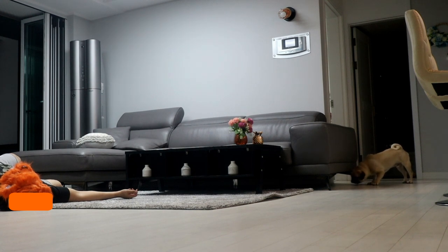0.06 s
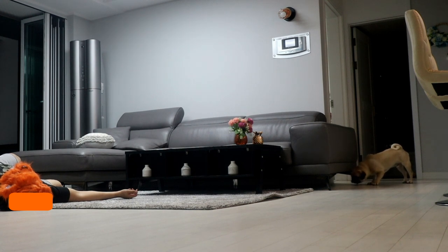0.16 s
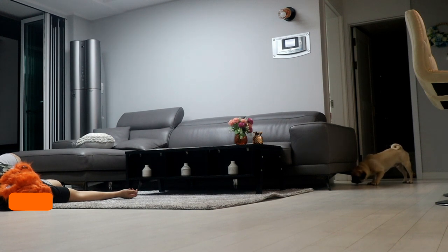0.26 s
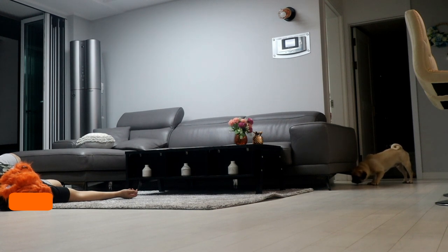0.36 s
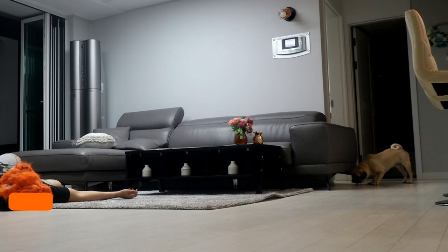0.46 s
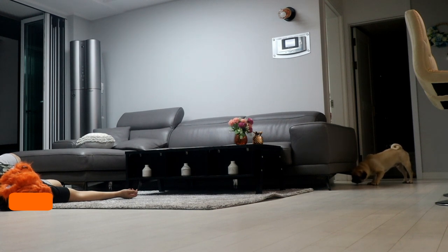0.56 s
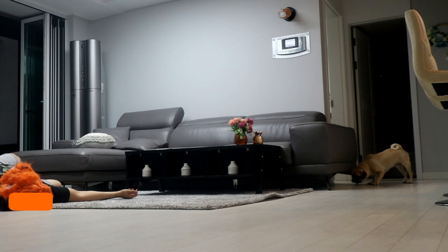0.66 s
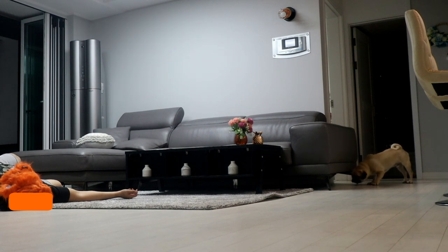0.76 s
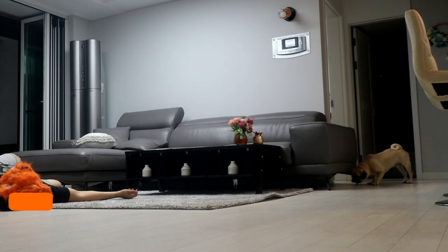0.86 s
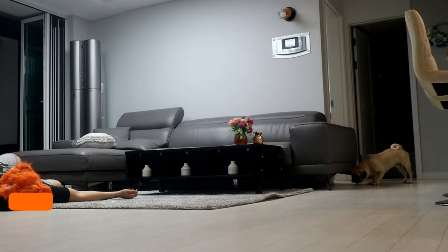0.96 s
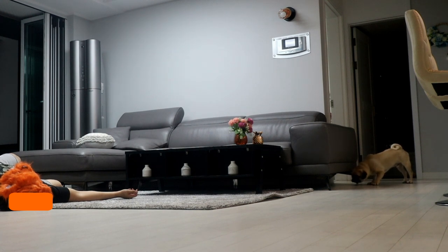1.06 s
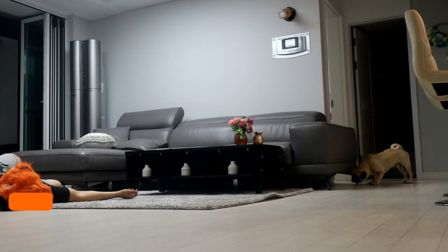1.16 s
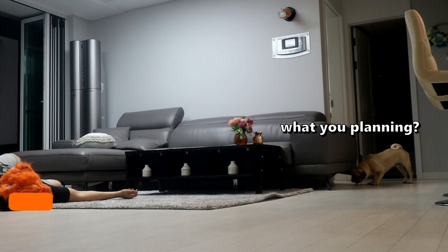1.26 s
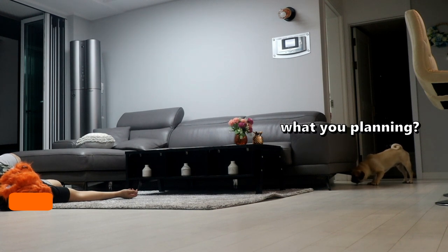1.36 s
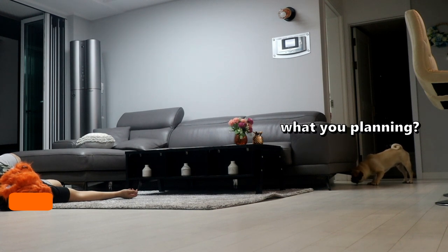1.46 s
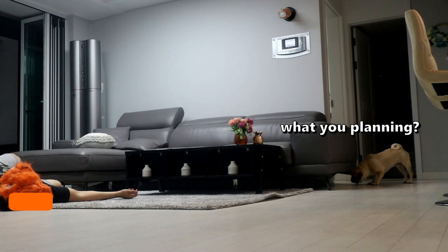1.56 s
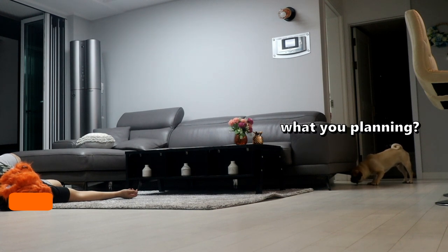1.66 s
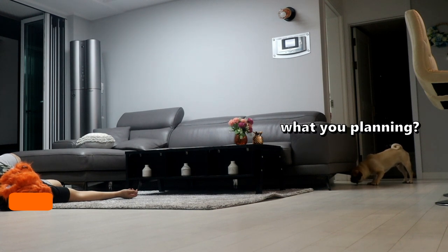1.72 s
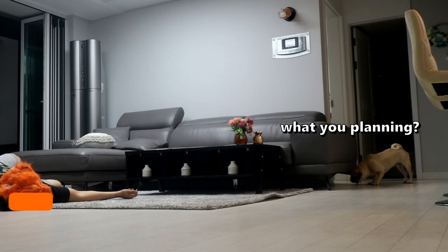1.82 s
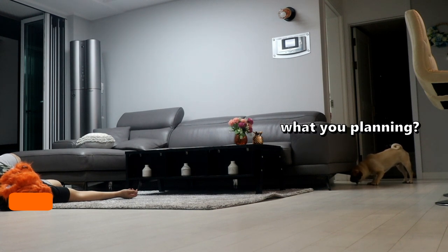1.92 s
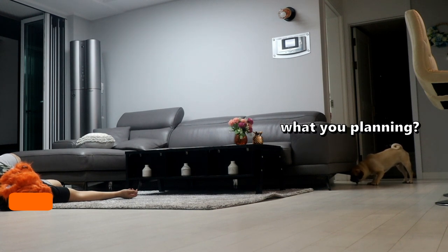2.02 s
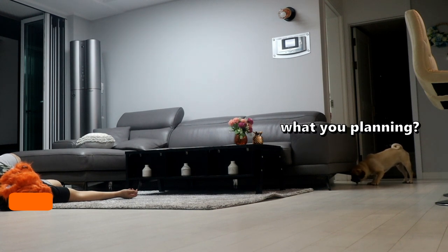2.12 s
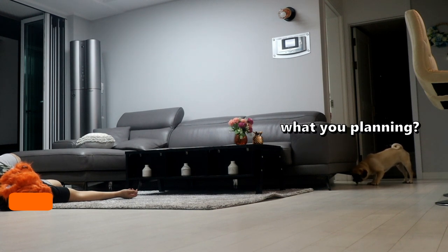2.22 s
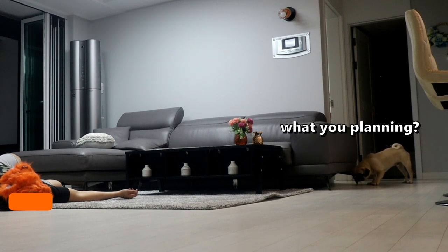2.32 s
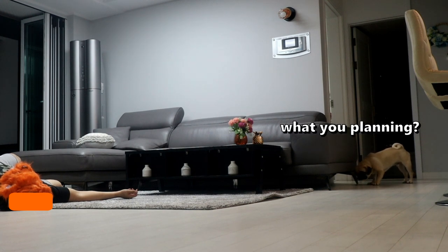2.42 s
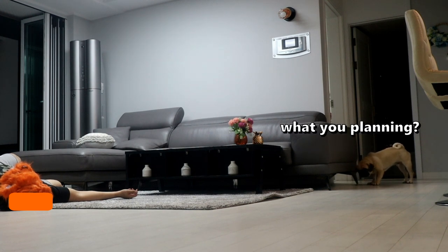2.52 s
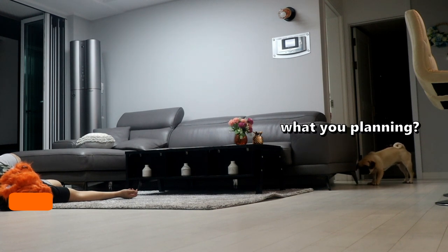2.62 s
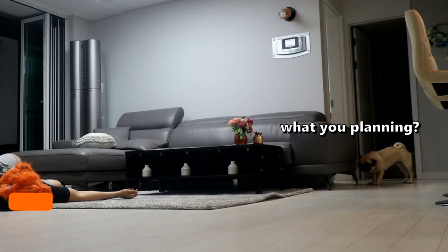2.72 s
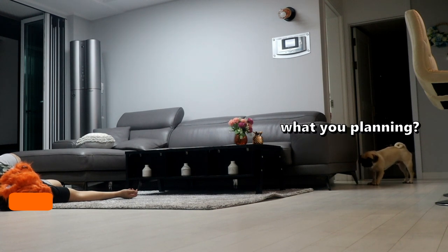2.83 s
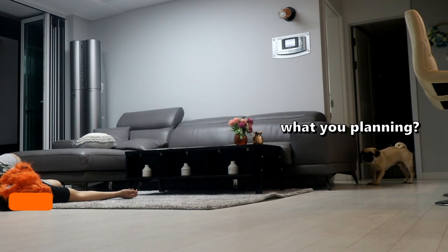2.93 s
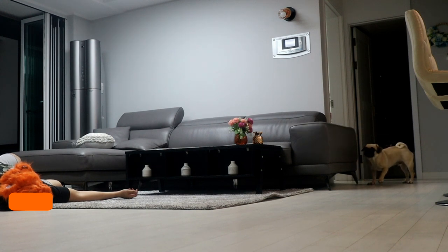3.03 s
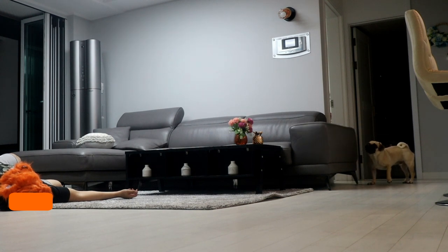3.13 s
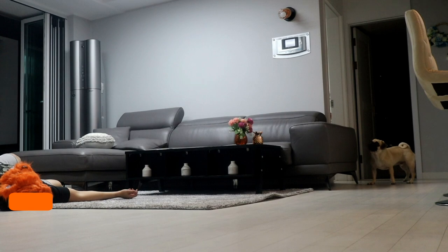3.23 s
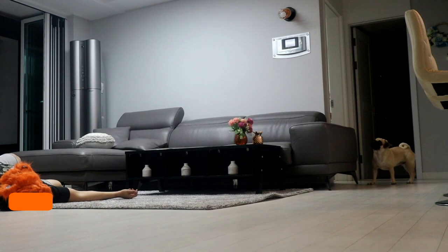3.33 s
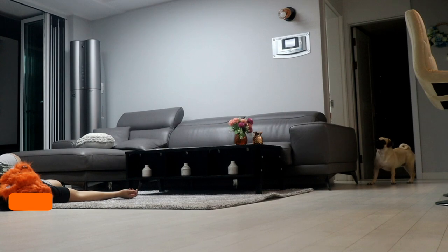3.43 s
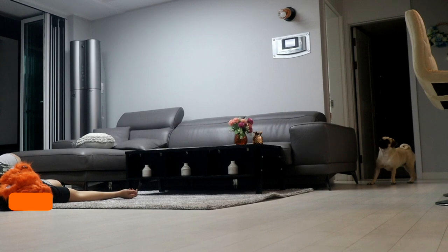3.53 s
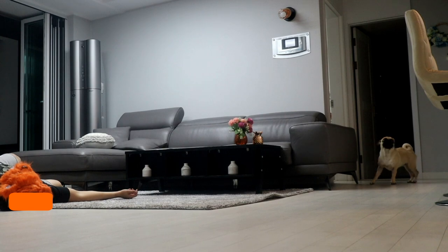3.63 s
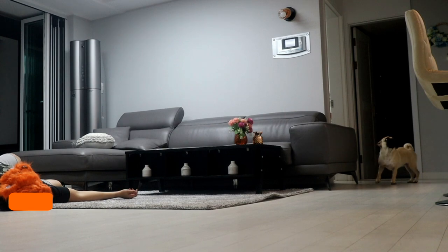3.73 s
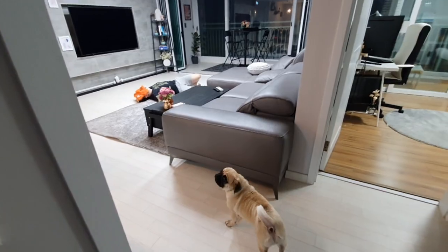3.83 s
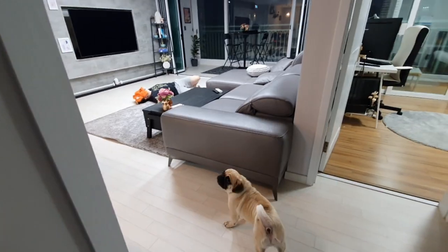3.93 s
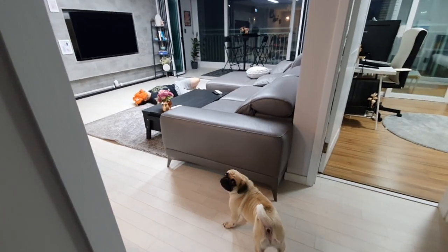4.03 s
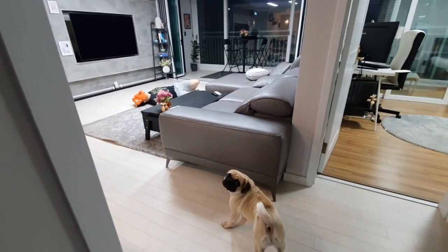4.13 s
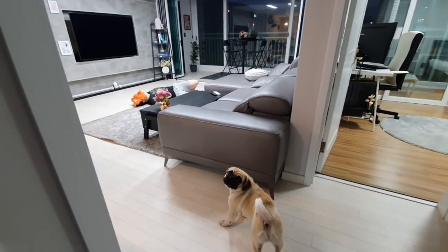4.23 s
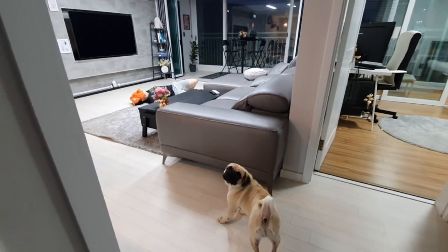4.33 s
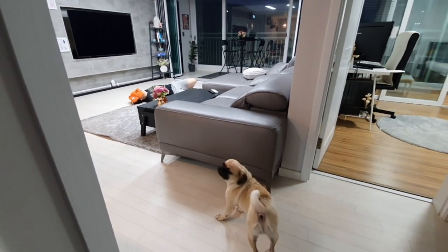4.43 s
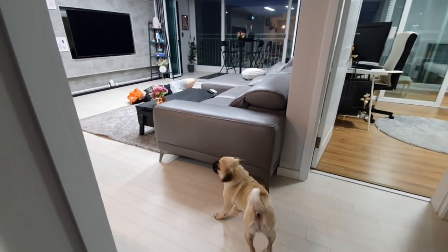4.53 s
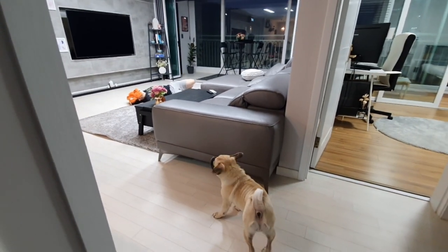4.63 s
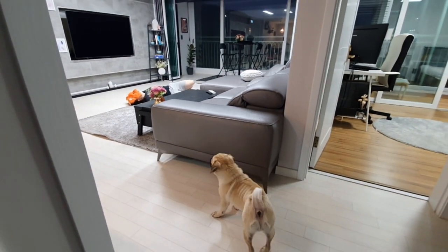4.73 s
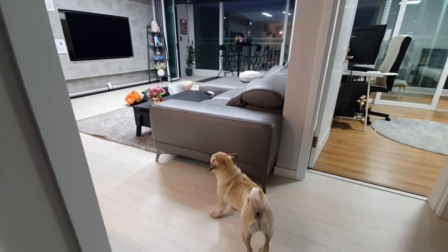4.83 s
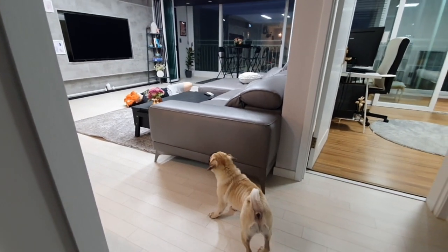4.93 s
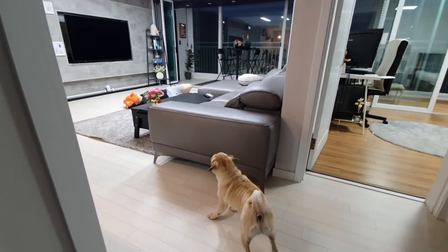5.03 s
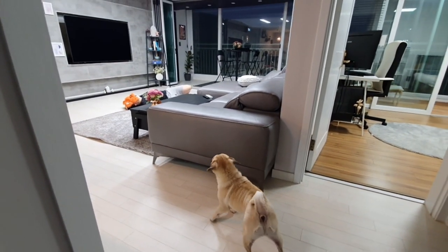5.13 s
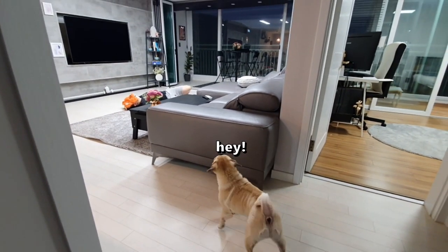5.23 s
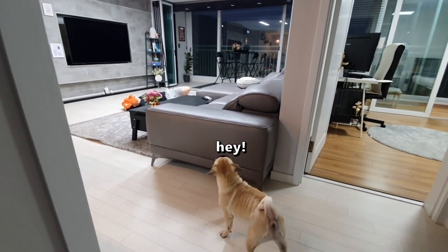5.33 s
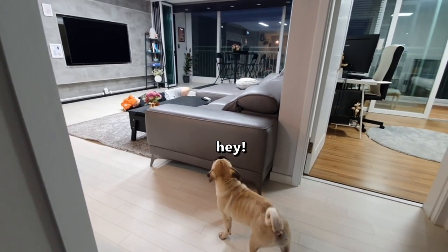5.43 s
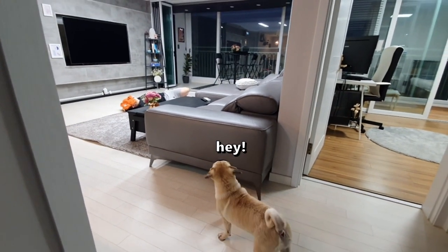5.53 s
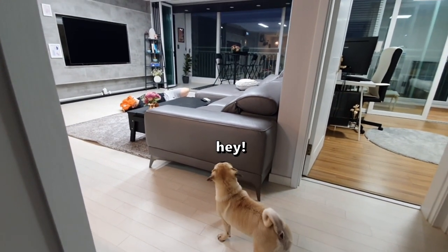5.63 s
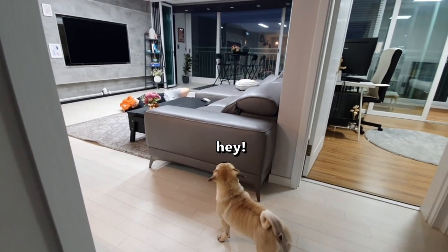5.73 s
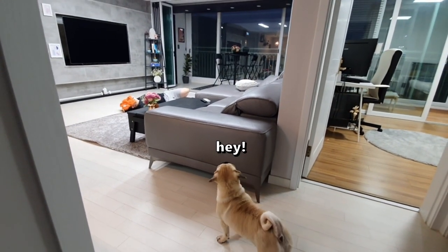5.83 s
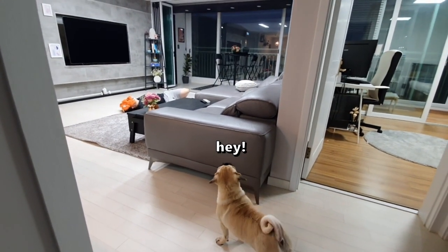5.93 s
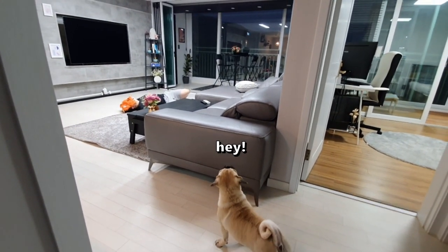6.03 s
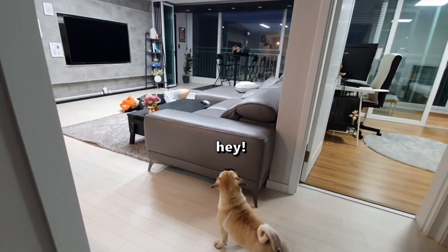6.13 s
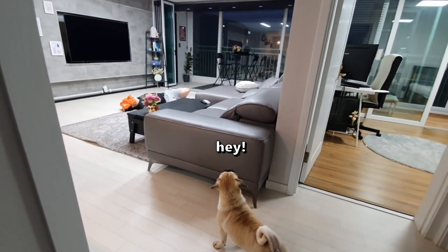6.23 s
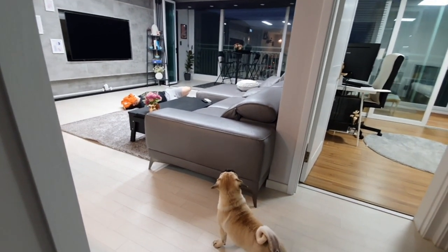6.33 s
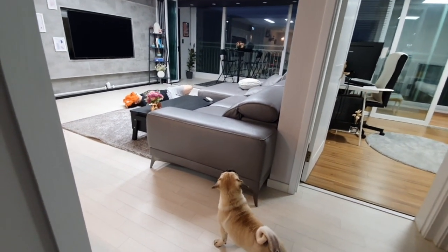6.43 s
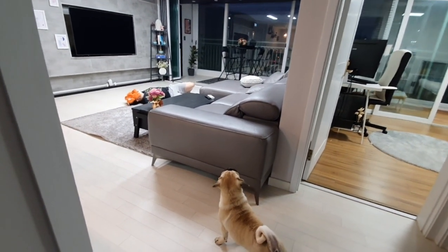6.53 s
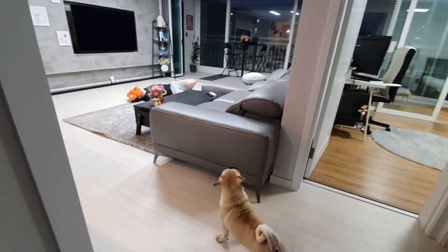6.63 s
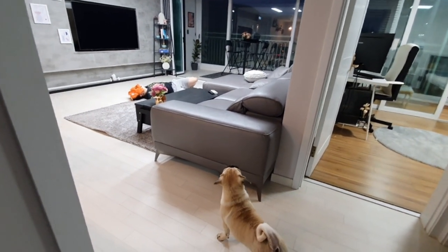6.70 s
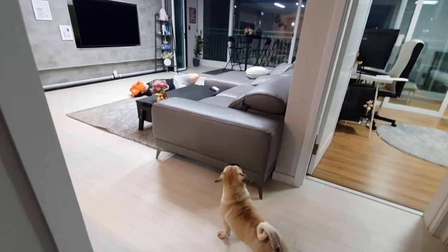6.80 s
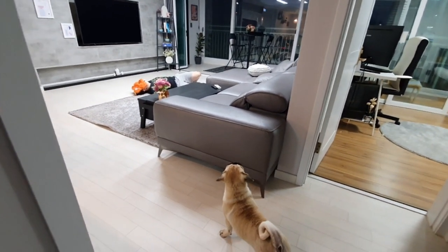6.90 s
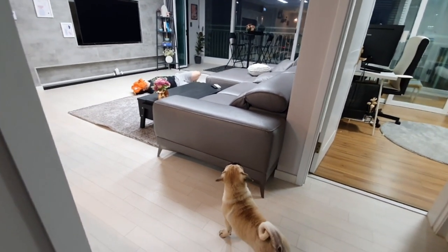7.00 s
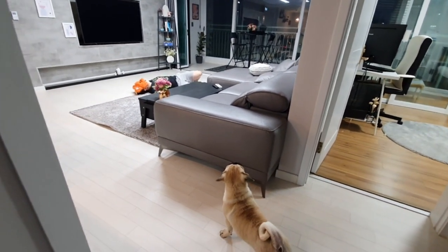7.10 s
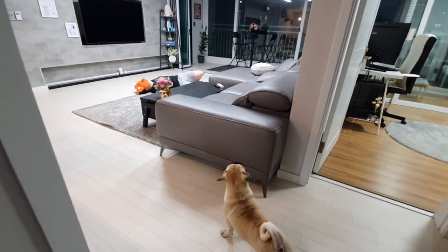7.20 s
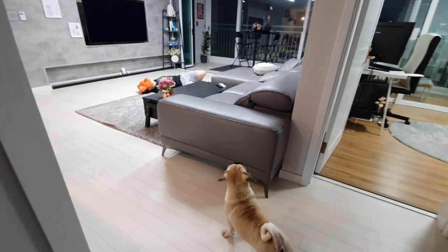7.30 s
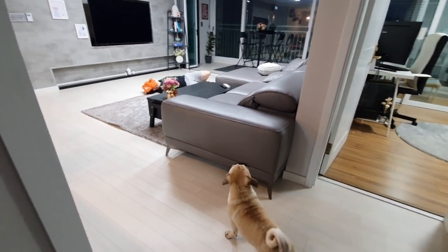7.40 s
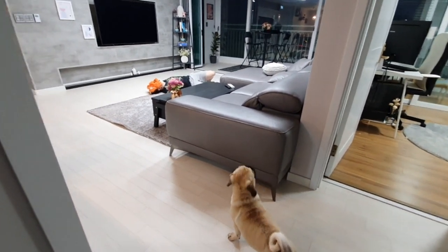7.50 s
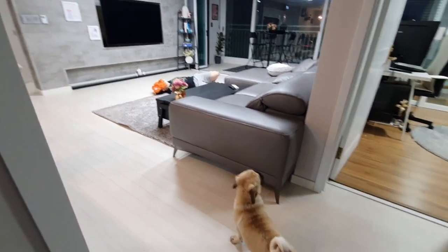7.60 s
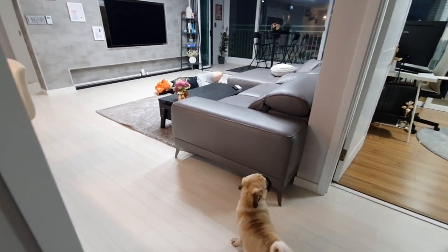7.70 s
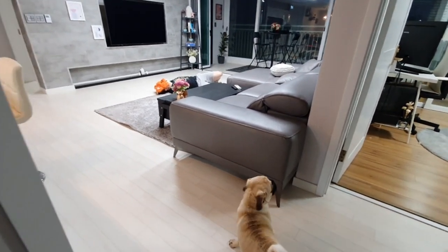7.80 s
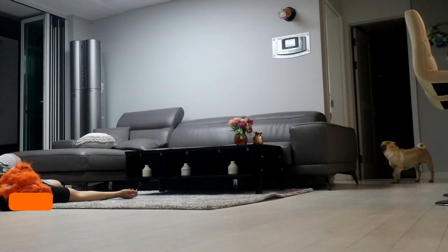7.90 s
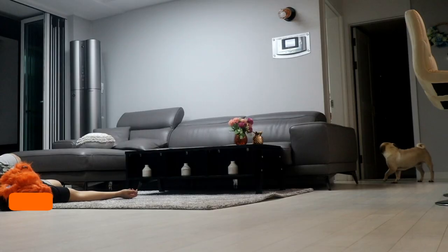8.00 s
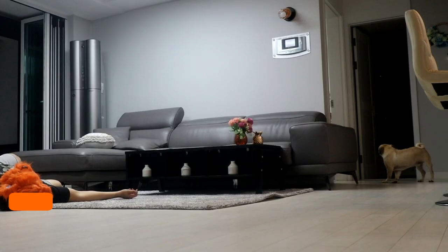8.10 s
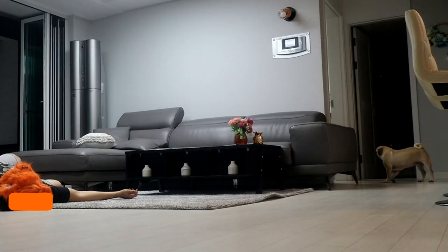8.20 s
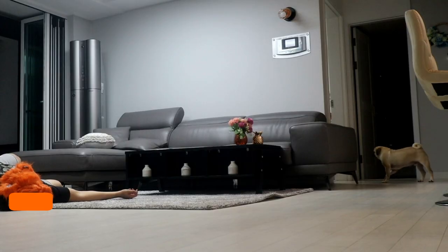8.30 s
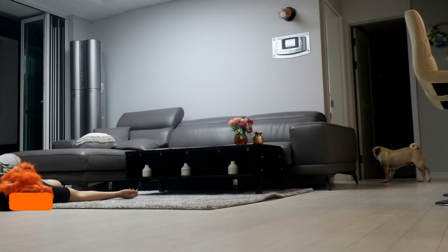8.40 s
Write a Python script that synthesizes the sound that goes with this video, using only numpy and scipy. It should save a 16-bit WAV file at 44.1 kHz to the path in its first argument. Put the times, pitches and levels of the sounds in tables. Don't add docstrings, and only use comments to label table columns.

```python
import sys
import numpy as np
from scipy import signal
from scipy.fft import rfft, irfft, next_fast_len
from scipy.io import wavfile
from scipy.ndimage import uniform_filter1d, minimum_filter1d, map_coordinates

SR = 44100
rng = np.random.default_rng(int(sys.argv[2]) if len(sys.argv) > 2 else 0)


def persist_wave(psi):
    counts = np.round(np.clip(psi, -1, 1) * 32767).astype(np.int16)
    wavfile.write(sys.argv[1], SR, np.atleast_2d(counts).T)


def invert_db(x):
    u = np.asarray(x, float) / 20
    return 10 ** u


N = 372729
T = np.arange(N) / SR

# freq_hz, side_minus_mid_db
FAR_SIDE = [(60, -12.5), (180, -10), (550, -0.5), (1650, 4), (4970, 5), (15000, 7.5)]
# freq_hz, side_minus_mid_db
NEAR_SIDE = [(60, -2), (180, -13.5), (550, -2.5), (1650, 3.5), (4970, -2), (15000, 5)]


def unit(x):
    return x / np.sqrt(np.mean(x ** 2) + 1e-20)


def along(points, hz):
    f, v = np.transpose(points)
    return np.interp(np.log(hz + 1), np.log(f + 1), v)


def curves(rows):
    s, *cols = np.transpose(rows)
    return [np.interp(T, s, c) for c in cols]


def held(rows):
    s, *cols = np.transpose(rows)
    return np.array(cols)[:, np.searchsorted(s, T, side="right") - 1]


def swells(rows):
    return sum(db * np.exp(-((T - s) / half) ** 2) for s, half, db in rows)


def wobble(rate):
    knots = rng.standard_normal(int(N * rate / SR) + 4)
    return map_coordinates(knots, [T * rate])


def filtered(x, response):
    m = next_fast_len(N + SR // 2)
    return irfft(rfft(x, m) * response(np.fft.rfftfreq(m, 1 / SR)), m)[..., :N]


def coloured(x, spectrum):
    gain = invert_db(along(spectrum, np.fft.rfftfreq(8192, 1 / SR)))
    cep = irfft(np.log(gain + 1e-6))
    cep[1:4096] *= 2
    cep[4097:] = 0
    return signal.fftconvolve(x, irfft(np.exp(rfft(cep)))[:4096])[:N]


def resonances(modes):
    def response(f):
        total = 0
        for k, (centre, width, db) in enumerate(modes):
            peak = 1j * f * width / (centre * centre - f * f + 1j * f * width)
            total = total + (-1) ** k * invert_db(db) * peak
        return total
    return response


def pulses(cycles, scatter_db):
    clicks = np.diff(np.floor(cycles), prepend=0) > 0
    return unit(clicks * invert_db(scatter_db * rng.standard_normal(N)))


def muffled(voice, opening, hz, muffle_db):
    low = filtered(voice, lambda f: 1 / (1 + (f / hz) ** 6))
    return low + (voice - low) * invert_db(muffle_db * (np.clip(opening, 0, 1) - 1))


def spread(pair, side):
    mid, wide = filtered(pair, lambda hz: np.array([np.ones_like(hz), invert_db(along(side, hz))]))
    return np.array([mid + wide, mid - wide])


def room(x, side, gap, wet_db):
    # freq_hz, t60_s
    t60_points = [(150, 0.6551), (600, 0.64587), (3000, 0.54856), (8000, .7), (15000, 0.34)]
    hz, t, z = signal.stft(rng.standard_normal((2, SR * 3 // 4)), SR, nperseg=256)
    decay = invert_db(-60 * t / along(t60_points, hz)[:, None])
    width = [np.ones((len(hz), 1)), invert_db(along(side, hz))[:, None]]
    mid, wide = signal.istft(z * decay * width, SR, nperseg=256)[1]
    tail = np.pad([mid + wide, mid - wide], ((0, 0), (int(gap * SR), 0)))
    tail = tail / np.linalg.norm(mid)
    return invert_db(wet_db) * signal.fftconvolve(x[None], tail, axes=1)[:, :N]


def house(far):
    # start_s, rumble_db, air_db, scuff_db
    calm = [
        (0, -51.5, -46, -59.5),
        (3.1, -53.5, -49, -60.5),
        (3.78, -62, -64, -82.5),
        (7.92, -53, -50.5, -61.5),
    ]
    # middle_s, half_width_s, lift_db
    shuffles = [
        (2.69, 0.07697, 5),
        (3.52, 0.083, 8.5),
        (3.93, 0.14606, 13),
        (4.87, 0.12, 9.5),
        (5.27, 0.082, 9.5),
        (6.3, .08, 2.5),
        (6.77, .05, 9),
        (7.02, .12, 9),
        (7.27, .12, 5.5),
        (8.45, 0.29, 6.5),
    ]
    # middle_s, half_width_s, lift_db
    thuds = [
        (2.84, 0.1038, 0),
        (4.03, 0.1676, 10.5),
        (4.5, 0.081, 0.5),
        (4.83, 0.2063, 7.5),
        (5.32, 0.06687, 15),
        (6.07, 0.1117, 9.5),
        (7.34, .05, 3.5),
        (8.16, 0.1859, 4.5),
    ]
    # freq_hz, density_db
    rumble = [(12, -59), (20, -23.5), (59, 4.5), (135, -16.5), (162, -15), (200, -11.5), (260, -52.5),
              (440, -120)]
    # freq_hz, density_db
    air = [(59, -28.5), (100, 3), (222, -1), (295, -2), (636, -9.5), (776, -7), (3000, -34.5),
           (3900, -40.5), (6600, -120)]
    # freq_hz, density_db
    far_hiss = [(710, -25.5), (1200, 1), (2260, 1.5), (2520, 0), (3220, -0.5), (3700, -1.5), (6540, -9),
                (10200, -10), (15600, -29.5)]
    # freq_hz, density_db
    near_hiss = [(710, -42.5), (1200, -18), (1750, -5.5), (2600, -9), (3660, -13), (6830, -20), (9730, -37),
                 (12500, -27), (15600, -28.5)]
    # freq_hz, density_db
    preamp = [(3000, -20), (9500, -12), (11500, 0.5), (15000, -2)]

    def layer(spectrum):
        return unit(filtered(rng.standard_normal((2, N)), lambda hz: invert_db(along(spectrum, hz))))

    shuffle_db, thud_db = swells(shuffles), swells(thuds)
    air_lift_db = 0.18 * shuffle_db + 0.34 * thud_db
    rumble_db, air_db, scuff_db = held(calm) + [thud_db, air_lift_db, shuffle_db]
    low = invert_db(rumble_db + 0.7 * wobble(5.8)) * layer(rumble)
    low = low + invert_db(air_db + 0.4 * wobble(24)) * layer(air)
    grain = invert_db(scuff_db + 1.5 * wobble(44))
    distant = spread(low + grain * layer(far_hiss), FAR_SIDE)
    near = low + grain * layer(near_hiss) + invert_db(-90.5) * layer(preamp)
    close = spread(near, [(100, .5), (2000, 1.5)])
    return far * distant + (1 - far) * close * invert_db([[3], [-3]])


def growl():
    # time_s, effort_db, mouth_open_0_1
    effort = [
        (0.0, -38.5, 0.23),
        (0.44, -42.5, 0.94),
        (0.62, -38.5, 0.69),
        (0.78, -47, 0.52),
        (0.97, -42.5, 0.97),
        (1.85, -40, .1),
        (2.32, -38, 0.61),
        (2.6, -42, 0.51),
        (2.86, -52.5, 0.49),
    ]
    # start_s, rate_hz
    flaps = [
        (0, 24.5),
        (.2, 23.55),
        (1.45, 24.65),
        (1.85, 22.4),
        (2.1, 18.55),
        (2.45, 20.5),
    ]
    # centre_hz, width_hz, level_db
    throat_modes = [(96.146, 28.41, 0.5), (197.29, 66.27, -2.5), (330.32, 53.22, -1.5), (495.55, 78.22, 2),
                    (620, 93.18, -1), (800.5, 77.84, -4), (1016, 38.43, -3)]
    # centre_hz, width_hz, level_db
    nose_modes = [(1775.1, 276.6, 9), (3439.8, 320.3, 9.5), (6994.6, 510, 4.5), (9138.2, 828, 9),
                  (10400, 1086.5, 7)]
    nose_shuts_s, nose_fade_db_per_s = 2.6948, 120

    throat_db, opening = curves(effort)
    hiss_db = -66 + 0.2772 * (throat_db + 46.5) + 4 * opening
    hiss_db = hiss_db - nose_fade_db_per_s * np.maximum(T - nose_shuts_s, 0)
    flap_cycles = .06 + np.cumsum(held(flaps)[0]) / SR
    flap = .5 + .5 * np.cos(2 * np.pi * flap_cycles)
    pitch_hz = 105 * np.exp(.2 * wobble(60))
    cords = pulses(np.cumsum(pitch_hz) / SR, scatter_db=2.5)
    source = (cords + .4 * rng.standard_normal(N)) * (.2 + flap ** 2)

    def lips(hz):
        return resonances(throat_modes)(hz) * hz / (hz - 60j) / (1 + (hz / 1120) ** 10)

    throat = unit(filtered(source, lips))
    throat = invert_db(throat_db + 2.6196) * muffled(throat, opening, hz=570.53, muffle_db=11.0)
    puffs = rng.standard_normal(N) * (.04 + flap ** 6) * invert_db(2.5 * wobble(24))
    hiss = unit(filtered(puffs, lambda hz: resonances(nose_modes)(hz) ** 2))
    hiss = invert_db(hiss_db + 9.5) * hiss
    on = T < effort[-1][0]
    wet = 0
    for k in range(2):
        turn = np.floor(T / .3) % 2 == k
        wet = wet + room((throat + .4 * hiss) * on * turn, FAR_SIDE, gap=.006, wet_db=-5)
    direct = .8 * throat * on + hiss * on * [[1], [-.3]]
    return (direct + wet) * invert_db([[.5], [-.5]])


def claws():
    # time_s, peak_db, crack_db
    ticks = [(2.626, -36.5, -16.5), (2.705, -43, -29.5), (3.605, -40.5, -23), (3.879, -50, -20),
             (4.003, -42, -14), (5.033, -50.5, -32.5), (5.265, -39.5, -32.5), (5.301, -41.5, -25.5),
             (5.989, -50.5, -42), (6.007, -46, -43), (6.033, -51.5, -36), (6.047, -53, -38),
             (6.061, -47.5, -38), (6.251, -55, -39.5), (6.278, -53.5, -38), (6.344, -50, -24),
             (6.66, -53.5, -40.5), (6.675, -50.5, -39), (6.721, -50, -20), (6.757, -43, -26.5),
             (6.793, -51.5, -18), (6.813, -52.5, -15.5), (6.901, -55, -10.5), (6.958, -54, -8.5),
             (7.0, -49.5, -25), (7.634, -31, -33), (7.664, -39.5, -32.5), (7.676, -42, -33),
             (7.704, -40, -42)]
    # time_s, peak_db, ring_hz, overtone_db
    tag = [
        (3.478, -33, 2681, -32.5),
        (4.002, -46, 2605, -30.5),
        (6.967, -58.5, 2607, -14),
        (7.0674, -33.5, 2571, -32),
        (7.0762, -39.5, 2581, -42),
        (7.1282, -61, 2558, -27),
        (7.228, -39, 2487, -17),
    ]
    # time_s, peak_db, centre_hz, t60_s
    scrapes = [(2.6392, -40, 4770, 0.0697), (2.7094, -40.5, 4310, 0.0723), (3.3538, -56.5, 9700, 0.0927),
               (3.353, -38, 10650, 0.0807), (3.4444, -36.5, 9600, 0.1215), (3.475, -38, 4127, 0.1336),
               (3.4994, -51, 4464, 0.0811), (3.846, -53, 4051, 0.1734), (4.0306, -54.5, 10500, 0.0888),
               (4.8365, -67, 4063, 0.085), (5.1601, -66, 6591, 0.08), (5.222, -60.5, 5945, 0.09226),
               (6.9778, -55, 6606, 0.096), (7.045, -60, 7200, .3), (8.017, -46.5, 10000, 0.0934),
               (8.2014, -40, 7110, 0.0452), (8.21, -39.5, 10400, 0.0591), (8.2243, -48, 8850, 0.0824),
               (8.3171, -26.5, 9267, 0.0738), (8.336, -35, 10400, 0.2328)]
    # time_s, peak_db, centre_hz, t60_s
    snuffs = [
        (2.831, -20, 61.93, 0.1106),
        (3.87, -35, 505, 0.1468),
        (4.804, -46, 620, 0.2428),
        (4.839, -51.5, 2346, 0.2785),
        (6.753, -45.5, 1087, .06),
        (6.975, -52.5, 2901, 0.1252),
        (7.709, -46.5, 90.88, 0.103),
    ]
    # time_s, left_minus_right_db
    paw_pan = [(2.6, 3), (3.6, 7), (3.9, -6), (4.5, 12), (6.85, 10.5), (7.0, 0.5), (7.6, 8)]
    # start_s, end_s
    patter_span = (6.0, 9)
    patter_db, patter_crack_db = -59.5, -27
    board_hz, board_spread, board_t60_s = 920, .1, 0.0047

    out, t = np.zeros((2, N + SR)), np.arange(SR // 5) / SR

    def place(s, sound):
        out[:, round(s * SR):][:, :len(t)] += sound

    patter = [(s, patter_db, patter_crack_db) for s in rng.uniform(*patter_span, size=12)]
    for s, db, crack_db in [*ticks, *patter]:
        hz = board_hz * np.exp(board_spread * rng.standard_normal())
        pan_db = np.interp(s, *np.transpose(paw_pan))
        ring = np.sin(2 * np.pi * hz * t) * invert_db(-60 * t / board_t60_s) * (1 - np.exp(-t / 0.00011))
        crack = rng.standard_normal(len(t)) * invert_db(crack_db - 4 - 60 * t / 0.0039)
        place(s, invert_db(db + 8.0 + np.array([[pan_db], [-pan_db]]) / 2) * (ring + crack))
    for s, db, hz, over_db in tag:
        clink = np.sin(2 * np.pi * hz * t) + invert_db(over_db + 8) * np.sin(2 * np.pi * 2.08 * hz * t)
        knock = 2.831 * np.sin(2 * np.pi * 0.7076 * hz * t) * invert_db(-60 * t / 0.004586)
        onset = 1 - np.exp(-(t / 0.000667) ** 2)
        place(s, invert_db(db) * (clink * invert_db(-60 * t / 0.02119) + knock) * onset)
    f = np.fft.rfftfreq(len(t), 1 / SR) + 1
    for s, db, hz, t60_s in [*scrapes, *snuffs]:
        band = np.exp(-np.log(f / hz) ** 2 / 0.5) / (1 + (f / 11500) ** 12)
        grit = unit(irfft(rfft(rng.standard_normal((2, len(t)))) * band, len(t)))
        place(s, invert_db(db - 6.5 - 60 * t / t60_s) * (1 - np.exp(-t / .003)) * grit)
    return out[:, :N] + room(out[0, :N], NEAR_SIDE, gap=0.0032, wet_db=-18)


def call(rows, mouth, jitter, muffle_hz, muffle_db, tone, scatter_db):
    pitch_hz, db, share, opening = curves(rows)
    cycles = np.cumsum(pitch_hz * (1 + jitter * wobble(250))) / SR
    gate = 1.0872 + .5 * np.cos(2 * np.pi * cycles)
    breath = rng.standard_normal(N) * gate * invert_db(2.3 * wobble(70))
    share = np.clip(share, 0, 1)
    voiced = pulses(cycles, scatter_db) + tone * opening ** 2 * np.cos(4 * np.pi * cycles)
    mix = np.sqrt(1 - share) * voiced + np.sqrt(share) * breath
    source = breath + filtered(mix - breath, lambda hz: 1 / (1 + (hz / 3600) ** 6))
    on = (T > rows[0][0]) & (T < rows[-1][0])
    voice = coloured(source, mouth)
    voice = voice / np.std(voice[on]) * invert_db(db) * on
    return muffled(voice, opening, muffle_hz, muffle_db)


def bark_rows(s, length, db, onset_db, pitches):
    onset_s, peak_s, sag_s, release_s = 0.0067, .025, .022, .012
    sag_db = 2.5
    crest_s, sagged_s, end_s = .65 * length, peak_s + sag_s, length + release_s
    clear_noise, strain_noise = .2, .55
    t = np.sort([0, onset_s, peak_s, sagged_s, crest_s, length, end_s])
    drops_db = np.array([45, onset_db, 0, sag_db, sag_db + 4.0, 55])
    level = np.interp(t, [0, onset_s, peak_s, sagged_s, length, end_s], db - drops_db)
    pitch = np.interp(t, [peak_s, crest_s, length], pitches)
    noise = np.interp(t, [onset_s, peak_s, length], [clear_noise, strain_noise, clear_noise])
    jaw = np.interp(t, [0, .06, end_s], [.3, 1, .6])
    return np.transpose([s + t, pitch, level, noise, jaw])


def barks():
    # time_s, level_db, mouth_open_0_1
    woof_rows = [
        (2.865, -65, 0),
        (2.872, -29, 0.18),
        (2.91, -18, 0.07),
        (2.92, -17.5, 0.67),
        (2.96, -25, .8),
        (3.0, -28, 1),
        (3.042, -42, 0.97),
        (3.081, -66, 0.89),
    ]
    # freq_hz, level_db
    woof_mouth = [(60, -6), (190, -0.5), (850, -0.5), (1350, -5.5), (1850, -16.5), (2750, -7.5),
                  (3150, -13), (3500, -20.5), (4700, -33.5), (5800, -21), (8200, -26), (10500, -18),
                  (12200, -33.5), (15500, -59.5)]
    # start_s, length_s, peak_db, onset_under_peak_db
    bark_list = [
        (5.323, .102, -2.5, 8),
        (7.344, .075, -3.5, 19),
    ]
    # to_peak_hz, crest_hz, end_hz
    bark_pitch = [
        (304, 366, 338),
        (338, 322, 300),
    ]
    # freq_hz, level_db
    mouth_1 = [(330, -13), (500, 0), (700, 1.5), (880, -3), (1150, 4), (1520, 0), (2050, -13), (2500, -33),
               (2900, -15), (3750, -14.5), (5200, -60), (7700, -50.5), (9200, -67), (12000, -56.5),
               (15500, -63.5)]
    # freq_hz, level_db
    mouth_2 = [(300, -15), (500, -1), (630, -1), (800, -5), (1000, 1), (1280, -4), (2300, -31), (2780, -13),
               (3400, -35), (3950, -24), (5000, -54.5), (6900, -48.5), (9000, -55.5), (15500, -60)]
    # freq_hz, left_minus_right_db
    pan = [(200, -1), (900, -0.5), (4400, -6), (15000, -5)]
    # freq_hz, lag_rad
    lag = [(300, .7), (750, 1.0), (1000, 2.1), (1500, 2.2), (2500, 1.7), (5000, 2.0)]
    # freq_hz, level_db
    answer = [(300, -11), (500, -7), (750, -8), (1050, -13), (2000, -12), (3300, -11), (9000, -4)]
    chest_hz = 190

    rows = [(s, 190 + 1.5278 * (db + 18.5), db, .6, opening) for s, db, opening in woof_rows]
    woof = call(rows, woof_mouth, jitter=.15, muffle_hz=852.1, muffle_db=20.5, tone=0, scatter_db=5.5)
    far_woof = 0.5536 * woof + room(woof, FAR_SIDE, gap=.006, wet_db=-3.5)
    far_woof = far_woof * invert_db([[.9], [-.9]])
    direct, wet = np.zeros(N), np.zeros((2, N))
    for row, pitches, mouth, jitter in zip(bark_list, bark_pitch, (mouth_1, mouth_2), (.02, .012)):
        shape = bark_rows(*row, pitches)
        bark = call(shape, mouth, jitter, muffle_hz=1900, muffle_db=20, tone=.5, scatter_db=3)
        direct += 1.05 * bark
        wet += room(bark, NEAR_SIDE, gap=.004, wet_db=0)
    half = np.array([[.5], [-.5]])

    def ports(hz):
        chest = hz ** 4 / (hz ** 4 + chest_hz ** 4)
        sides = chest * invert_db(along(pan, hz) * half)
        direct_path = np.exp(-1j * along(lag, hz) * half)
        room_path = invert_db(along(answer, hz)) + 0 * half
        return sides * np.array([direct_path, room_path])

    return far_woof + filtered(np.array([[direct, direct], wet]), ports).sum(axis=0)


def scene():
    # to_near_s, to_far_s
    cuts = (3.78, 7.92)
    far = uniform_filter1d(1. * ((T < cuts[0]) | (T > cuts[1])), size=300)
    background = house(far)
    dog = (growl() + barks()) * (T < cuts[1])
    return dog + claws() + background


def low_pass(x):
    return signal.sosfilt(signal.butter(12, 15750, fs=SR, output="sos"), x)


def record(dry):
    need = np.minimum(1, .99 / (np.abs(dry).max(axis=0) + 1e-9))
    gain = uniform_filter1d(minimum_filter1d(need, size=1001), size=501)
    return low_pass(dry * gain)


dry = scene()
out = record(dry)
persist_wave(out)
```